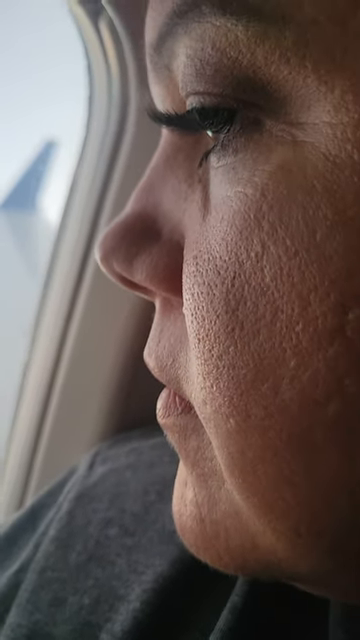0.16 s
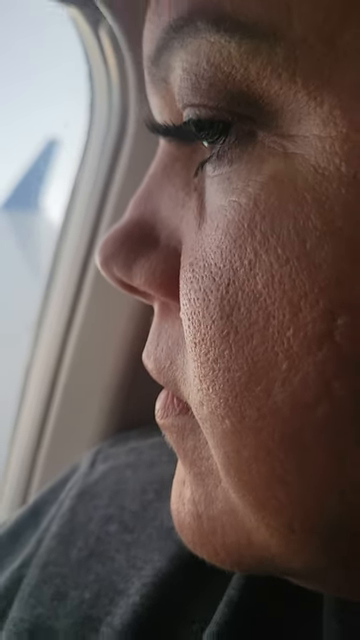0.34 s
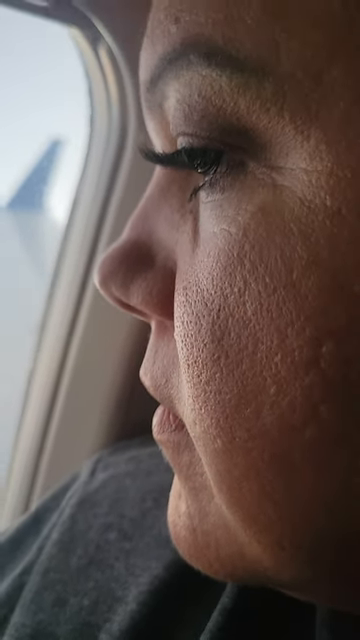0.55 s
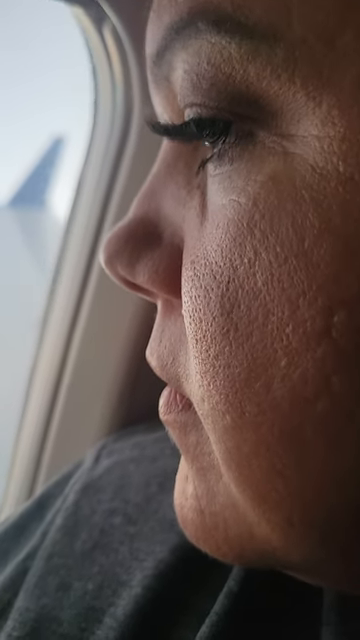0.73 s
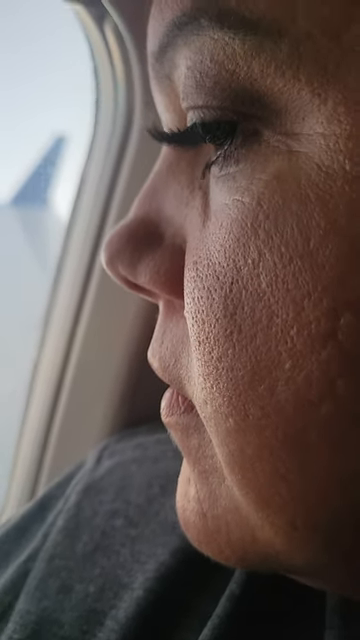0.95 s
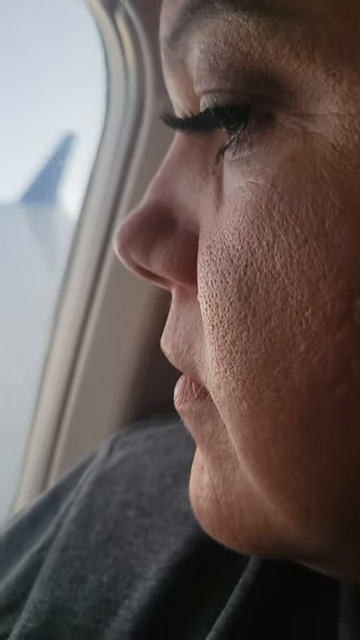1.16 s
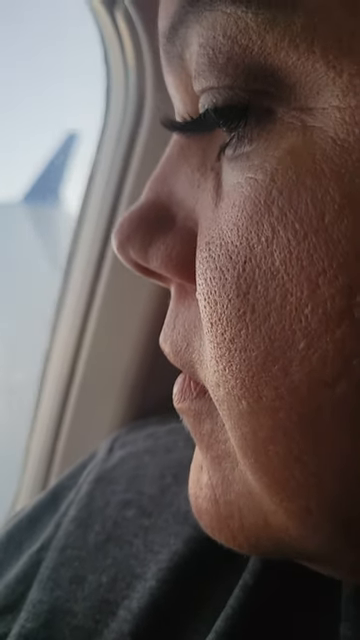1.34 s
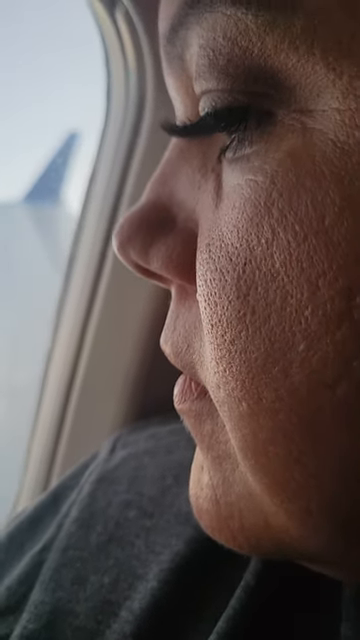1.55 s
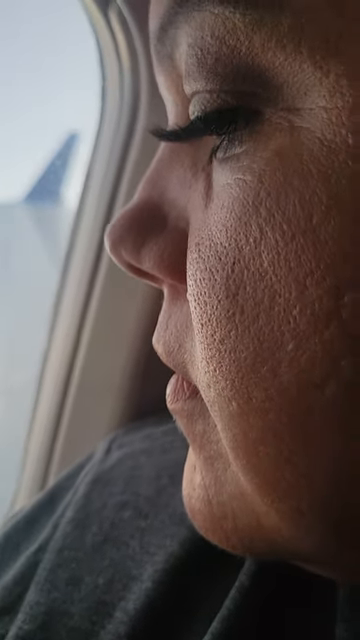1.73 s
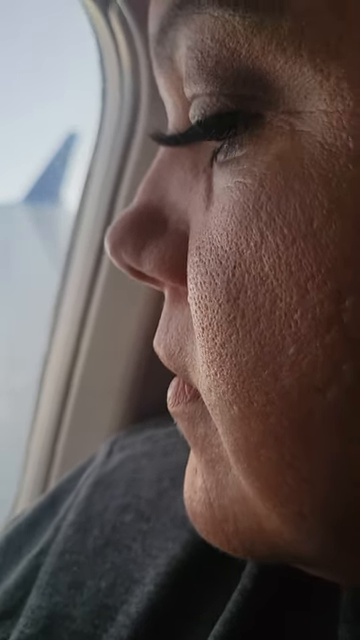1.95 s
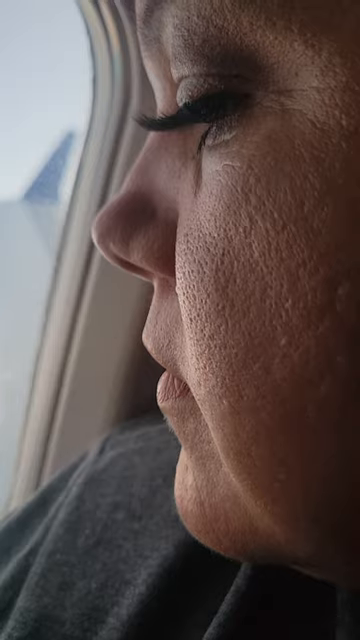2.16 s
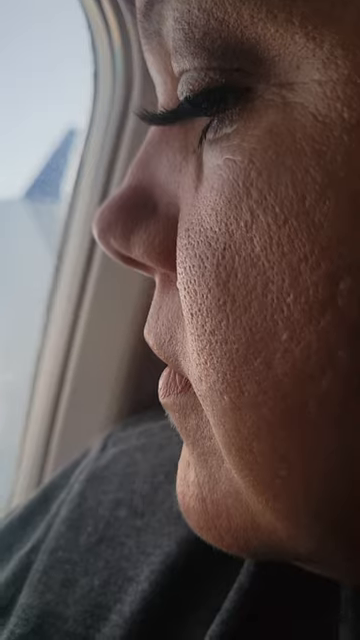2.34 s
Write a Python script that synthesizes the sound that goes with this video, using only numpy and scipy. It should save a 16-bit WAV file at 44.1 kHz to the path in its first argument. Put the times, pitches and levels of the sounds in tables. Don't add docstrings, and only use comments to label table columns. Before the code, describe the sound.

Inside a cruising airliner, engines drone and throb beneath rushing air and a thin hiss with faint whines. A barely audible squeak comes first, then a brief plastic tick nearer the right; close stereo phone-like microphones by the window.

```python
import sys
import numpy as np
from scipy import signal
from scipy.fft import rfft, irfft, next_fast_len
from scipy.io import wavfile
from scipy.ndimage import uniform_filter1d, map_coordinates

SR = 44100
rng = np.random.default_rng(int(sys.argv[2]) if len(sys.argv) > 2 else 0)


def master(y):
    cut = np.clip(np.atleast_2d(y).T, -1, 1)
    pcm = np.round(cut * 32767)
    wavfile.write(sys.argv[1], SR, pcm.astype(np.int16))


def field_ratio(decibels):
    return 10 ** (np.asarray(decibels, dtype=float) / 20)


N = 110250

# (frequency [Hz], likeness [-1..1])
PORT_LIKENESS = [(130, 0.98), (260, 0.64), (400, 0.19), (550, -0.47), (900, -0.59), (1750, -0.45),
                 (2250, 0.14), (3200, 0.12)]
LEFT_MORE = np.array([[0.5], [-0.5]])
RIGHT_MORE = -LEFT_MORE


def unit(x):
    return x / np.sqrt(np.mean(x ** 2) + 1e-20)


def along(points, hz):
    f, v = np.transpose(points)
    return np.interp(np.log(hz + 1), np.log(f + 1), v)


def curve(rows):
    s, v = np.transpose(rows)
    return np.interp(np.arange(N) / SR, s, v)


def wobble(rate):
    return map_coordinates(rng.standard_normal(400), [np.arange(N) * rate / SR])


def filtered(x, response):
    m = next_fast_len(N + SR // 2)
    hz = np.fft.rfftfreq(m, 1 / SR)
    return irfft(rfft(x, m) * response(hz), m)[..., :N]


def above(corner_hz, hz, order=4):
    return 1 / (1 + (corner_hz / (hz + 1)) ** order)


def right_later(x, lag_s):
    return filtered(x, lambda hz: np.exp(2j * np.pi * hz * lag_s * LEFT_MORE))


def colour(spectrum, peaks, hz):
    lift_db = sum(db / (1 + (2 * (hz - centre) / width) ** 2) for centre, width, db in peaks)
    return field_ratio(along(spectrum, hz) + lift_db)


def rush(spectrum, peaks, likeness, patchy_db):
    z = signal.stft(rng.standard_normal((2, N)), nperseg=512)[2]
    patches = uniform_filter1d(rng.standard_normal(z.shape[1:]), size=6, axis=0)
    patches = uniform_filter1d(patches, size=14, axis=1)
    pair = signal.istft(z * field_ratio(patchy_db * unit(patches)), nperseg=512)[1][:, :N]

    def response(hz):
        turn = np.arccos(np.clip(along(likeness, hz), -1, 1)) / 2
        return colour(spectrum, peaks, hz) * [np.cos(turn), np.sin(turn)]

    mid, side = filtered(pair, response)
    return unit(np.array([mid + side, mid - side]))


def engines():
    # (frequency [Hz], density [dB per Hz])
    rumble_spectrum = [(12, -62), (20, -30), (50, -12.5), (97, 1.5), (118, -1), (161, -12.5), (246, -9),
                       (330, -24), (430, -26), (730, -120)]
    # (frequency [Hz], width [Hz], lift [dB])
    cabin_modes = [(27, 10, 2), (44, 10, 4), (65, 14, 5), (78, 8, -2), (90, 9, 1), (99, 8, -3), (109, 9, 2),
                   (135, 12, 2), (200, 20, 2), (247, 25, 3)]
    # (time [s], level [dB])
    surges = [(0.0, -18), (0.77, -18.5), (0.79, -12), (0.83, -28), (0.96, -16), (1.09, -18.5),
              (1.11, -12.5), (1.2, -25), (1.23, -16), (1.36, -18), (1.91, -13.5), (1.96, -25.5),
              (2.03, -12.5), (2.08, -19), (2.17, -13.5), (2.28, -26), (2.36, -14), (2.5, -16.5)]
    rumble = rush(rumble_spectrum, cabin_modes, PORT_LIKENESS, patchy_db=1.72)
    booms = filtered(rumble, lambda hz: above(52, hz, order=6) / (1 + (hz / 150) ** 6))
    span, steady_share = round(0.045 * SR), 0.9
    power = np.mean(booms ** 2, 0)
    chance = np.abs(uniform_filter1d(uniform_filter1d(power, span), span)) / np.mean(power)
    surge_db = curve(surges)
    surging = booms / (chance + 0.067) ** (steady_share / 2) * field_ratio(surge_db - surge_db.mean())
    return field_ratio(surge_db.mean() + 1.5) * (surging + rumble - booms)


def airflow():
    # (frequency [Hz], density [dB per Hz])
    roar_spectrum = [(160, -45), (280, 1), (493, -2), (1040, -13.5), (1260, -12.5), (1740, -18),
                     (2160, -20), (2730, -26), (3600, -34.5), (4680, -67), (7920, -120)]
    # (frequency [Hz], width [Hz], lift [dB])
    panel_modes = [(400, 60, 2), (490, 40, 1), (540, 70, -2), (1030, 120, 3), (1280, 90, -4),
                   (1390, 100, 3), (1510, 80, -3), (1730, 150, 4), (1880, 80, 3), (2690, 130, 5),
                   (3350, 110, 3)]
    return field_ratio(-24) * rush(roar_spectrum, panel_modes, PORT_LIKENESS, patchy_db=0.3)


def vent():
    # (frequency [Hz], density [dB per Hz])
    hiss_spectrum = [(1410, -26), (2400, -11), (2660, 0), (3780, -8.5), (4600, -11), (6450, -13),
                     (8700, -30), (13400, -23.5), (15700, -29)]
    # (frequency [Hz], width [Hz], lift [dB])
    nozzle_modes = [(4440, 250, 0.5), (4720, 280, 7), (5420, 240, 4.5), (6080, 120, 0.5), (11900, 830, 4.5),
                    (12700, 900, 6.5), (13700, 900, 6)]
    # (time [s], level [dB])
    flow = [(0, 2.5), (.3, 2), (.55, 2.5), (.75, 3.5), (1.1, 2.5), (1.25, 3.5), (1.285, 3.5), (1.33, 6.5),
            (1.37, 2.5), (1.45, 1.5), (1.5, 5), (1.58, 4.5), (1.65, 2), (2.5, 2.5)]
    hiss = rush(hiss_spectrum, nozzle_modes, [(3000, 0.36)], patchy_db=0.5)
    hiss = right_later(hiss, lag_s=0.00045)
    top = filtered(hiss, lambda hz: above(8000, hz))
    flow_db = curve(flow)
    return field_ratio(-46) * (field_ratio(0.2 * flow_db) * (hiss - top) + field_ratio(1.65 * flow_db) * top)


def edge_tones():
    edge_hz = [4055, 4215, 6420]
    # (width [Hz], level [dB], likeness of the ports [-1..1])
    edge_bands = [(100, -56, -.6), (150, -58, -.6), (110, -62, -0.2)]
    floor, lift_db = [(1000, -30)], 40
    total = 0
    for hz, (width, db, likeness) in zip(edge_hz, edge_bands):
        total = total + field_ratio(db) * rush(floor, [(hz, width, lift_db)], [(hz, likeness)], patchy_db=-0.5)
    return field_ratio(-3.5 * LEFT_MORE) * total


def tones():
    # (order of the motor rate, level [dB], phase between ports [rad])
    motor_orders = [(1, -52, 2.6), (2, -53, 2.4), (3, -60, 2.4), (4, -72, 1.6), (5, -76, .8), (6, -83, .5),
                    (7, -80, .5), (9, -73, .5)]
    # (frequency [Hz], level [dB], phase between ports [rad])
    engine_tones = [(862, -49, 2.8), (1034.5, -52, 2.8), (1353, -53, 2.8), (1593, -52, 1.8),
                    (1690, -54, 2.5), (1731, -47, 2.1), (5411, -74, 2), (7297, -78, 1), (9827, -82, .5)]
    motor_hz, swell_db, drift_rad = 1379.3, 2.5, 0.4
    t = np.arange(N) / SR
    lines = [(order * motor_hz, db, phase) for order, db, phase in motor_orders] + list(engine_tones)
    total = 0
    for hz, db, phase in lines:
        level = field_ratio(db + swell_db * wobble(5.25))
        angle = 2 * np.pi * hz * t + drift_rad * wobble(6.0)
        total = total + level * np.sin(angle + phase * RIGHT_MORE)
    return total


def squeak():
    middle_hz, rise_hz_per_s, length_s = 5380, 2000, 0.045
    t = np.arange(N) / SR - 0.742
    swell = np.exp(-(2 * t / length_s) ** 4)
    return field_ratio(-57) * swell * np.sin(2 * np.pi * (middle_hz + rise_hz_per_s * t / 2) * t)


def snap():
    # (frequency [Hz], density [dB per Hz])
    trim_spectrum = [(2500, -50), (3800, -19), (5000, -15), (9300, -9), (11000, -11), (11800, -2),
                     (14600, -7), (15600, -16)]
    # (frequency [Hz], width [Hz], lift [dB])
    trim_modes = [(9170, 300, 3), (12800, 430, 3)]
    # (frequency [Hz], level [dB], 60 dB decay time [s])
    trim_rings = [(4520, -9, .025), (5110, -8, .02), (6850, -9, .035), (11900, -5, .05), (12120, -10, .05)]
    snap_s, rise_s, slip_s = 1.319, 0.001, 0.0045
    snap_t60_s, echo_t60_s = 0.04, 0.1
    t = np.arange(N) / SR - snap_s
    after = np.clip(t - slip_s, 0, None)
    rise = np.exp(np.clip(t, None, 0) / rise_s)
    grain_db = 3 * map_coordinates(rng.standard_normal(N), [np.arange(N) * 900 / SR])
    grains = rng.standard_normal((3, N)) * field_ratio(grain_db)
    plastic = unit(filtered(grains, lambda hz: colour(trim_spectrum, trim_modes, hz)))
    rings = sum(field_ratio(db - 60 * after / t60) * np.sin(2 * np.pi * hz * t) for hz, db, t60 in trim_rings)
    direct = (plastic[0] * field_ratio(-60 * after / snap_t60_s) + rings) * rise
    direct = right_later(direct, lag_s=-0.0016)
    bright = filtered(plastic[1:], lambda hz: above(9000, hz))
    echo = bright * rise * field_ratio(-13 - 60 * after / echo_t60_s)
    return field_ratio(-28.5) * (direct + echo) * field_ratio(-8.5 * LEFT_MORE)


def scene():
    return engines() + airflow() + vent() + edge_tones() + tones() + squeak() + snap()


def band_limit(x):
    return signal.sosfilt(signal.butter(12, 15820, fs=SR, output="sos"), x)


def record(dry):
    # (frequency [Hz], left over right [dB])
    port_colour = [(35, -2.5), (100, -0.7), (230, -4.5), (550, 0.5), (1500, -3.5), (3000, -0.5), (6500, -2),
                   (9000, 15), (13000, -3)]
    ports = filtered(dry, lambda hz: field_ratio(along(port_colour, hz) * LEFT_MORE) * (hz < 15750))
    return band_limit(ports)


dry = scene()
out = record(dry)
master(out)
```